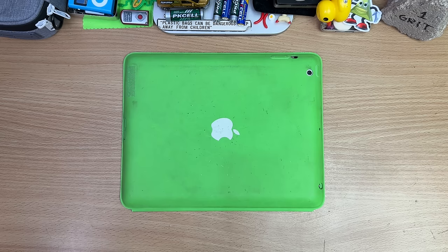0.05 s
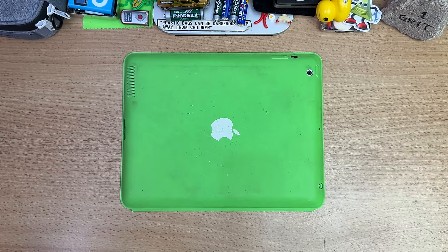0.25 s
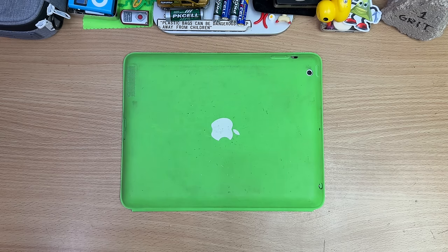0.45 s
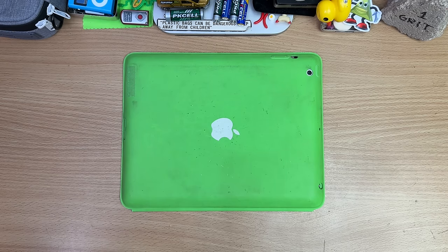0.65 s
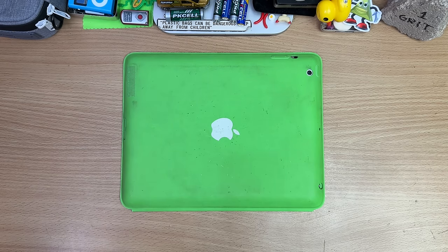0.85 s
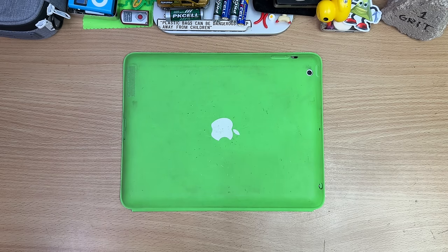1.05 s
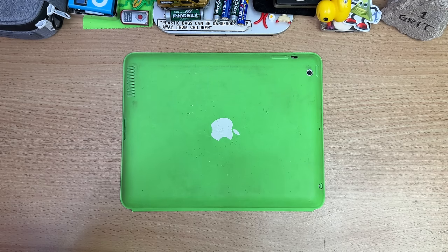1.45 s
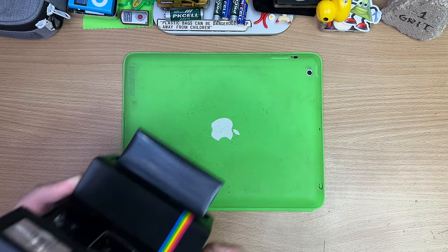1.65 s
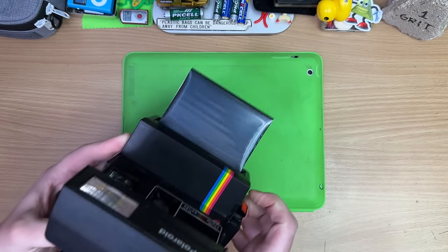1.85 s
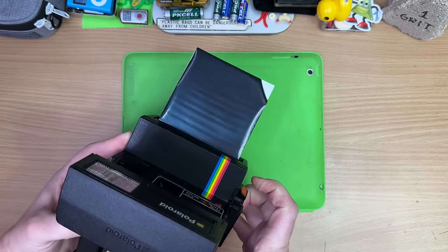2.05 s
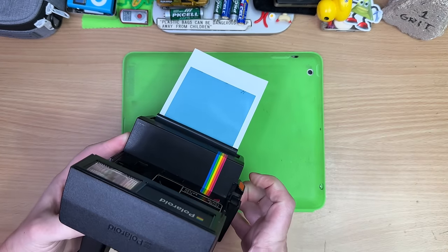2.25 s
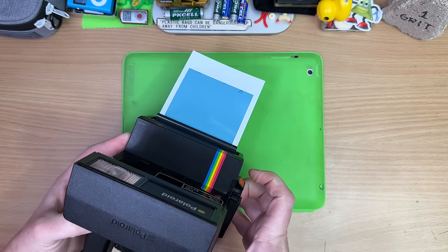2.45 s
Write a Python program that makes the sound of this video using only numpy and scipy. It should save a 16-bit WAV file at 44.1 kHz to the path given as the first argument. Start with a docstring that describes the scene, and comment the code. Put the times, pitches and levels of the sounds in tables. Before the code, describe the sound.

Close by in a small room, an instant camera gives a few sharp clicks and starts a motorized whine. The whir turns louder and raspier as the print slides out, then ends with a snap and a latch click.

```python
"""An instant camera's motor and plastic gears eject a print, over a desk in a small room.
The shutter snaps, an impact that excites the modes of the case. The gears spin up, rattling and whining
at multiples of the shaft speed. Rollers squeeze the print out by friction until it snaps free; the gears
run on, a latch drops and they coast to rest. A low hum and faint room noise lie underneath."""
import sys
import numpy as np
from scipy import signal
from scipy.fft import rfft, irfft
from scipy.io import wavfile
from scipy.ndimage import uniform_filter1d, map_coordinates

SR = 44100
rng = np.random.default_rng(int(sys.argv[2]) if len(sys.argv) > 2 else 0)


def generate_wav(sig):
    """Save sig (samples, or channels by samples) to the path in sys.argv[1] as 16-bit PCM at SR."""
    pcm = np.round(np.clip(np.atleast_2d(sig).T, -1, 1) * 32767).astype(np.int16)
    wavfile.write(sys.argv[1], SR, pcm)


N = 114660
T = np.arange(N) / SR
HZ = np.fft.rfftfreq(N, 1 / SR)


def amp(db):
    """Decibels to amplitude ratio."""
    return 10 ** (np.asarray(db) / 20)


def unit(x):
    """Normalisation to rms 1."""
    return x / np.sqrt(np.mean(x ** 2) + 1e-20)


def level(table, column):
    """Amplitude envelope from one dB column, silent outside the table's times."""
    rows = np.array(table)
    return amp(np.interp(T, rows[:, 0], rows[:, column], left=-200, right=-200))


def decay(t, t60):
    """Exponential damping: 60 dB down after t60 seconds."""
    return np.exp(-np.log(1000) * t / t60)


def swell(middle, length):
    """A raised-cosine envelope."""
    return np.cos(np.pi * np.clip((T - middle) / length, -.5, .5)) ** 2


def colour(x, spectrum):
    """Spectral shaping over log frequency, rms 1."""
    hz, db = np.transpose(spectrum)
    gain = amp(np.interp(np.log(HZ + 1), np.log(hz + 1), db))
    return unit(irfft(rfft(x) * gain, N))


def keep_side(x, hz, kind):
    """A low-pass or high-pass filter."""
    return signal.sosfilt(signal.butter(3, hz, kind, fs=SR, output="sos"), x)


def drift(hz):
    """Random modulation: low-passed noise, rms 1."""
    return unit(irfft(rfft(rng.standard_normal(N)) / (1 + (HZ / hz) ** 4), N))


# Partials of the hum. Each row: frequency in Hz, level in dB.
HUM_PARTIALS = [(63, -57), (125.6, -64), (148, -64)]
# Spectrum of the room noise. Each row: frequency in Hz, relative density in dB.
AIR_SPECTRUM = [(20, -58), (45, -25.5), (90, -13.5), (150, -13.5), (270, -28.5), (350, -21.5), (950, -32),
                (3000, -51.5), (16000, -71)]
# Hum and noise swell and dip together. Each row: time in seconds, gain in dB.
BACKGROUND_GAIN = [(0, -1), (1.2, 2.5), (1.9, 4), (2.1, -2), (2.17, -14), (2.32, 5), (2.6, 3)]

def background(waver_db=1.5, air_db=-58.5):
    """Amplitude and phase modulation make a low hum waver over faint room noise."""
    hum = np.zeros(N)
    for hz, db in HUM_PARTIALS:
        peak = np.sqrt(2) * amp(db + waver_db * drift(5.6))
        hum += peak * np.sin(2 * np.pi * hz * T + 0.3 * drift(8))
    air = amp(air_db) * colour(rng.standard_normal(N), AIR_SPECTRUM)
    return level(BACKGROUND_GAIN, 1) * (hum + air)


# Impacts of shutter, cams, print and latch. Each row: start in seconds, part struck,
# decay time (t60) in seconds, then a relative level in dB for each of five bands.
IMPACTS = [(0.2073, "case", 0.15, -40.5, -34.5, -32.5, -33, -31.5),
           (0.2143, "shutter", 0.028, -41, -28.5, -22.5, -25.5, -10.5),
           (0.2555, "case", 0.075, -54, -40.5, -45, -46, -45),
           (0.3217, "cam", 0.069, -49, -36.5, -32, -31.5, -22.5),
           (0.3318, "lever", 0.071, -42.5, -26.5, -27, -30, -18.5),
           (0.381, "switch", 0.063, -40, -30.5, -31, -33, -27),
           (0.9023, "pawl", 0.05, -52.5, -34.5, -28.5, -30.5, -32),
           (1.2579, "case", 0.023, -30, -30, -33, -47, -26),
           (1.369, "case", 0.018, -41, -33, -45, -56, -50),
           (1.729, "case", 0.055, -41, -33.5, -28.5, -48, -25),
           (1.802, "case", 0.054, -31.5, -27.5, -29.5, -34, -27),
           (2.015, "case", 0.056, -36.5, -51, -28.5, -31, -26),
           (2.0867, "print", 0.02, -47.5, -47, -13.5, -17.5, -16),
           (2.098, "flap", 0.024, -38, -45.5, -10.5, -17, -21),
           (2.1005, "flap", 0.0098, -41, -45, -16.5, -25, -19),
           (2.1125, "case", 0.07, -42, -42.5, -35, -40.5, -53),
           (2.1369, "case", 0.021, -32, -29.5, -21, -36, -28),
           (2.3033, "latch", 0.11, -34, -31, -26.5, -34, -26.5),
           (2.513, "case", 0.12, -65, -62, -63, -72, -51.5)]
# The edges of those bands in Hz, and each band's decay time as a multiple of the impact's.
BAND_EDGES_HZ = [450, 820, 1950, 4300, 8000, 17000]
BAND_DECAY_RATIOS = [0.41, 1.15, 0.7, 0.81, 0.4]
# Modes of the case and of each part. Each row: frequency in Hz, dB relative to its band, t60 in seconds.
CASE_MODES = [(319, -10, 0.23), (660, -1, 0.082), (936.2, -5, 0.17)]
PART_MODES = {"case": [], "shutter": [(914, -4, .12), (5260, 0, 0.044), (5930, 7, 0.023),
              (9030, -14, 0.034)], "cam": [(2090, 1, .06), (2766, 1.5, 0.099), (3300, 7.5, 0.081)],
              "lever": [(1317, -8, 0.12), (1766, -3.5, 0.076), (2370, 9, 0.031)],
              "switch": [(962, 4, 0.095), (2350, 0, 0.034), (3900, -1, 0.043), (5750, 1, 0.11)],
              "pawl": [(2490, 5.5, 0.033), (4470, -1.5, 0.047)], "latch": [(1140, 4.5, 0.12)],
              "print": [(3150, -1.5, 0.027), (4050, 5, 0.019)], "flap": [(2260, -4, 0.027),
              (3420, -10.5, 0.023), (5160, 1.5, .018)]}

def snaps(rise_s=0.0013, contact_s=.00012, full_ring_s=.05, gain_db=-2):
    """Impact excitation: a hard contact and brief chatter, with the damped modes of part and case."""
    out, t = np.zeros(N), T[:SR // 4]
    filters = [signal.butter(4, band, "band", fs=SR, output="sos")
               for band in zip(BAND_EDGES_HZ, BAND_EDGES_HZ[1:])]
    for start, part, t60, *bands_db in IMPACTS:
        snap = np.zeros(len(t))
        chatter = rng.standard_normal(len(t)) * (1 - np.exp(-t / rise_s))
        chatter[round(contact_s * SR)] += 2 * amp(4)  # the contact impulse
        for sos, db, ratio in zip(filters, bands_db, BAND_DECAY_RATIOS):
            fall = decay(t, t60 * ratio)
            burst = signal.sosfilt(sos, chatter * fall)
            snap += amp(db) * burst * np.linalg.norm(fall) / np.linalg.norm(burst)
        shortening = min(t60 / full_ring_s, 1)  # short impacts ring the case more briefly
        case = [(hz, db, mode_t60 * shortening) for hz, db, mode_t60 in CASE_MODES]
        for hz, db, mode_t60 in case + PART_MODES[part]:
            band_db = bands_db[np.searchsorted(BAND_EDGES_HZ[1:], hz)]
            snap += amp(band_db + db) * decay(t, mode_t60) * np.sin(2 * np.pi * hz * t)
        span = out[round(start * SR):][:len(snap)]
        span += amp(gain_db) * snap[:len(span)]
    return keep_side(out, 270, "high")


# Resonances of the housing. Each row: frequency in Hz, bandwidth in Hz, boost in dB at depth 1.
HOUSING_RESONANCES = [(598, 29, 5.5), (1340, 42, 2), (1566, 41, 3.5), (4010, 210, 1), (5320, 230, 3),
                      (6170, 220, 4), (9320, 460, 4), (10490, 1000, 6.5)]

def housing(x, depth=1):
    """Resonance: the plastic housing acts as a minimum-phase filter, ringing after it is driven."""
    boost_db = sum(db / (1 + (2 * (HZ - hz) / width) ** 2) for hz, width, db in HOUSING_RESONANCES)
    log_gain = np.log(amp(depth * boost_db))
    mirrored = np.concatenate([log_gain, log_gain[-2:0:-1]])
    log_response = np.conj(signal.hilbert(mirrored))[:len(HZ)]
    return irfft(rfft(x) * np.exp(log_response), N)


# Speed of the motor. Each row: time in seconds, turns per second.
MOTOR_SPEED = [(.39, 125), (.46, 175), (.5, 202), (.54, 211), (.63, 218.5), (.75, 220), (.9, 218.3),
               (1.25, 213), (1.38, 205), (1.47, 216), (1.66, 221), (1.78, 226), (1.9, 233), (1.98, 235.5),
               (2.08, 246), (2.15, 190), (2.25, 213), (2.33, 206), (2.5, 183)]

def shaft_turns(inertia_s=0.048, waver=0.001226, waver_hz=21.5):
    """Rotation is the integral of speed, which inertia smooths and which wavers slightly."""
    speed = uniform_filter1d(np.interp(T, *np.transpose(MOTOR_SPEED)), int(inertia_s * SR))
    return np.cumsum(speed * (1 + waver * drift(waver_hz))) / SR


def gear(turns, ratio, bumps_per_motor_turn=150):
    """Periodic roughness: a gear's uneven rim repeats with each revolution."""
    rim = rng.standard_normal(int(bumps_per_motor_turn * ratio))
    return map_coordinates(rim, [turns / ratio % 1 * len(rim)], order=3, mode="grid-wrap")


# Gear reductions. Each entry: motor turns per turn of one gear.
REDUCTIONS = [1.9, 3.1]

def contact_noise(turns, ticks_per_s=260, spread_db=11.5, crossover_hz=1800, flutter_db=0.97):
    """Rough contact: friction noise, gear rims and ticks of single teeth excite the housing."""
    ticks = (rng.random(N) < ticks_per_s / SR) * rng.choice([-1, 1], N)
    teeth = ticks * amp(spread_db * np.minimum(rng.exponential(1, N), 4))
    rims = sum(gear(turns, ratio) for ratio in REDUCTIONS)
    mesh = unit(rng.standard_normal(N) + amp(-2) * rims)
    grind = keep_side(rng.standard_normal(N), crossover_hz, "low") + keep_side(mesh, crossover_hz, "high")
    return housing(grind + amp(-19) * unit(teeth)) * amp(flutter_db * drift(hz=44.6))


def whine(orders, turns, swell_db=2):
    """Shaft orders: tones at multiples of motor speed, broadened and modulated by bearing play; rms 1."""
    out = np.zeros(N)
    for multiple, db, width_hz in orders:
        play = np.cumsum(rng.standard_normal(N)) * np.sqrt(2 * np.pi * width_hz / SR)
        phase = 2 * np.pi * multiple * turns + uniform_filter1d(play, size=200)
        swing_db = swell_db * min(width_hz / 10, 1) * drift(hz=9)  # looser tones swing further
        out += amp(db) * unit(amp(swing_db)) * np.sin(phase)
    return unit(out)


# Gears turning without the print. Each row: time in seconds, rattle in dB, whine in dB.
FREE_LEVELS = [(.385, -76, -70), (.41, -43.5, -57), (.5, -41.5, -45.5), (.58, -43, -43.5),
               (.75, -39, -38.5), (.79, -42, -43.5), (.86, -40, -41), (1.24, -36.5, -42), (1.3, -39, -46),
               (1.4, -56, -75)]
# Spectra of their rattle and rasp. Each row: frequency in Hz, relative density in dB.
FREE_SPECTRUM = [(110, -50), (200, -13.5), (330, -16), (480, -26), (650, -10.5), (800, -14.5), (1100, -2.5),
                 (1450, -7), (1650, -10.5), (2400, -9), (3200, -14), (7500, -15.5), (10500, -15),
                 (16000, -19)]
RASP_SPECTRUM = [(700, -45), (1200, -1), (1750, -8), (2300, -4.5), (3200, -41)]
# Their tones. Each row: multiple of motor speed, relative level in dB, linewidth in Hz.
FREE_TONES = [(3, -1, 0.37), (4, -11.5, 2.7), (5, 0, 1.05), (6, -12, 5.67), (7, -8, 6.9), (11, -11.5, 7.9)]

def free_gears(contact, turns, rasp_swing_db=5, rasp_fade_db_per_s=15.5):
    """Gear meshing without load: rattle, whine and an uneven rasp that eases as the gears reach speed."""
    rattle = colour(contact, FREE_SPECTRUM)
    rasp = unit(colour(rng.standard_normal(N), RASP_SPECTRUM) * amp(rasp_swing_db * drift(hz=28)))
    easing = amp(-rasp_fade_db_per_s * (T - FREE_LEVELS[0][0]))
    tones = whine(FREE_TONES, turns)
    return level(FREE_LEVELS, 1) * (rattle + easing * rasp) + level(FREE_LEVELS, 2) * tones


# Plastic and print scraping past their guides.
# Each row: midpoint in seconds, length in seconds, frequency in Hz, bandwidth in Hz, level in dB.
GUIDE_SCRAPES = [(.865, 0.016, 1840, 400, -30), (0.863, .02, 1380, 200, -36.5),
                 (1.57, 0.16, 4460, 1510, -41.5), (1.83, 0.28, 4200, 1720, -37.5)]

def scrapes():
    """Sliding friction drives one resonance for a moment, giving a swell of band-limited noise."""
    out = np.zeros(N)
    for middle, length, hz, width, db in GUIDE_SCRAPES:
        band = irfft(rfft(rng.standard_normal(N)) / (1 + (2 * (HZ - hz) / width) ** 4), N)
        out += amp(db) * swell(middle, length) * unit(band)
    return out


# Rollers squeezing the print. Each row: time in seconds, rubbing in dB, whine in dB.
ROLLER_LEVELS = [(1.23, -53, -82), (1.265, -39, -46.5), (1.4, -32.5, -43.5), (1.55, -30.5, -42.5),
                 (1.8, -31.5, -41.5), (1.95, -31, -35), (2.08, -28, -35), (2.1, -29.5, -39),
                 (2.115, -83, -63)]
# Spectra of the early and late rubbing. Each row: frequency in Hz, relative density in dB.
EARLY_SPECTRUM = [(110, -45), (200, -25), (370, -5.5), (480, -23), (620, -2.5), (750, -7), (920, 6),
                  (1130, -3), (1450, 5.5), (1900, -4.5), (3000, -1), (7000, -5.5), (12300, -10),
                  (16000, -5.5)]
LATE_SPECTRUM = [(110, -39), (220, -21.5), (450, -14.5), (750, -9), (930, -2), (1200, -12.5), (1450, -15),
                 (2000, -9), (3500, -8), (5000, -12), (7000, -17), (10000, -16), (16000, -17.5)]
# Tones under load. Each row: multiple of motor speed, relative level in dB, linewidth in Hz.
ROLLER_TONES = [(0.99, -15.5, .5), (2.564, -8.5, 24), (3.968, -4.5, 35), (4.164, -2, 47), (6.075, -1.5, 14),
                (6.85, -13, 25)]

def rollers(contact, turns, crossfade_s=(1.48, 1.9)):
    """Friction under load: the drive whines and the rubbing changes spectrum as the print comes out."""
    late = np.interp(T, crossfade_s, [0, 1])
    rubbing = (1 - late) * colour(contact, EARLY_SPECTRUM) + late * colour(contact, LATE_SPECTRUM)
    return level(ROLLER_LEVELS, 1) * rubbing + level(ROLLER_LEVELS, 2) * whine(ROLLER_TONES, turns)


# Squeaks of the roller gears. Each row: midpoint in seconds, length in seconds,
# multiple of motor speed, linewidth in Hz, level in dB.
GEAR_SQUEAKS = [(1.365, 0.17, 14, 12, -40), (1.635, 0.39, 14, 13.8, -42.5), (1.755, 0.17, 15.7, 120, -38),
                (1.964, 0.39, 14, 18, -36.5), (2.02, 0.26, 22.4, 130, -44.5), (1.43, 0.32, 42.5, 117, -44),
                (2.1, 0.11, 42, 100, -50), (3.7, 0.44, 56, 380, -40), (1.84, .15, 56, 150, -48)]

def squeaks(turns):
    """High shaft orders: meshing teeth sing in bursts, at a pitch that follows the motor."""
    return sum(amp(db) * swell(middle, length) * whine([(multiple, 0, width)], turns)
               for middle, length, multiple, width, db in GEAR_SQUEAKS)


# Gears running on after the print is free. Each row: time in seconds, rattle in dB, whine in dB.
COAST_LEVELS = [(2.09, -66, -80), (2.11, -38.5, -66), (2.175, -47, -47), (2.23, -43.5, -63),
                (2.29, -38, -45), (2.35, -40.5, -44.5), (2.41, -44.5, -52.5), (2.48, -50.5, -57.5),
                (2.53, -82, -77)]
# Spectrum of their rattle. Each row: frequency in Hz, relative density in dB.
COAST_SPECTRUM = [(110, -39), (200, -29), (370, -8.5), (480, -27), (620, -1.5), (800, -10.5), (1200, -9),
                  (1600, -10), (3200, -12), (7000, -22), (10500, -20.5), (16000, -24)]
# Their tones. Each row: multiple of motor speed, relative level in dB, linewidth in Hz.
COAST_TONES = [(3, -1, 5.3), (5.7, -1.5, 31.2)]

def coasting_gears(contact, turns):
    """Gear meshing with the load released: rattle and whine run on, then die away."""
    rattle = colour(contact, COAST_SPECTRUM)
    return level(COAST_LEVELS, 1) * rattle + level(COAST_LEVELS, 2) * whine(COAST_TONES, turns)


# The falling tone of the slowing drive. Each row: time in seconds, frequency in Hz, level in dB.
FALLING_TONE = [(2.24, 520, -76), (2.3, 372, -43.5), (2.33, 278, -49), (2.4, 148, -84)]

def wind_down(jitter=0.02985):
    """Frequency glide: one gear tone sinks unsteadily as the drive loses speed."""
    times, pitch_hz, _ = np.transpose(FALLING_TONE)
    hz = np.interp(T, times, pitch_hz) * (1 + jitter * drift(hz=58.4))
    return level(FALLING_TONE, 2) * np.sqrt(2) * np.sin(2 * np.pi * np.cumsum(hz) / SR)


def reverberation(x, t60):
    """Diffuse reflections: convolution with a decaying noise tail of energy 1."""
    t = T[:SR // 3]
    tail = rng.standard_normal(len(t)) * decay(t, t60) * (1 - np.exp(-t * 1000))
    return signal.fftconvolve(x, tail / np.linalg.norm(tail))[:N]


def scene():
    """Superposition of the nearby camera, a short room tail and the hum, alike in both channels."""
    impacts = housing(snaps(), depth=0.58)
    turns = shaft_turns()
    contact = contact_noise(turns)
    drive = free_gears(contact, turns) + rollers(contact, turns) + coasting_gears(contact, turns)
    camera = impacts + drive + squeaks(turns) + scrapes() + wind_down()
    mono = camera + amp(-19.5) * reverberation(camera, t60=0.22) + background()
    return np.array([mono, mono])


def record(dry, ceiling=0.36, rumble_hz=38, top_hz=15850):
    """Soft saturation rounds the sharpest snaps; filters then limit the band at both ends."""
    rounded = ceiling * np.tanh(dry / ceiling)
    no_rumble = signal.sosfilt(signal.butter(4, rumble_hz, "high", fs=SR, output="sos"), rounded)
    low_pass = signal.firwin(255, top_hz, window=("kaiser", 8), fs=SR)
    return signal.oaconvolve(no_rumble, low_pass[None], "same")


dry = scene()
out = record(dry)
generate_wav(out)
```